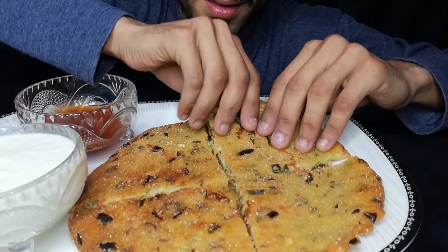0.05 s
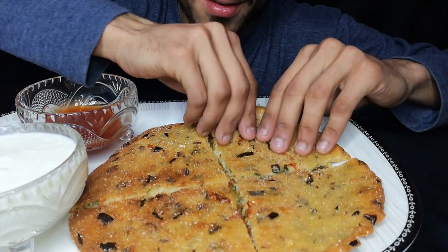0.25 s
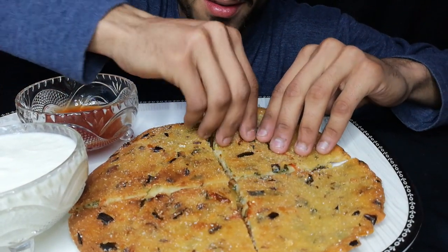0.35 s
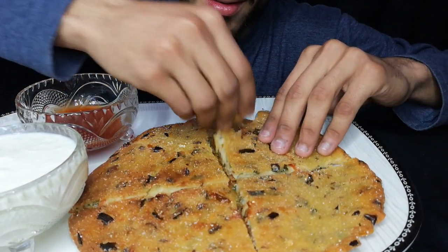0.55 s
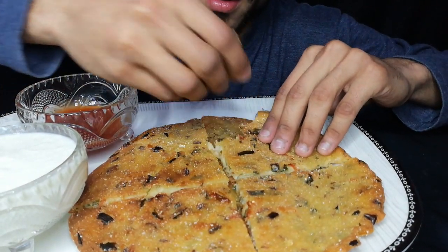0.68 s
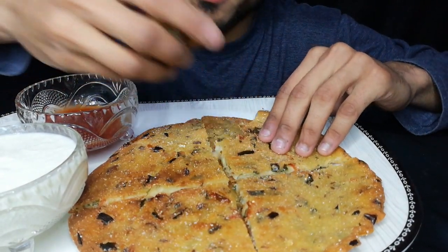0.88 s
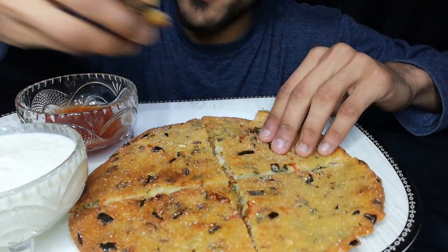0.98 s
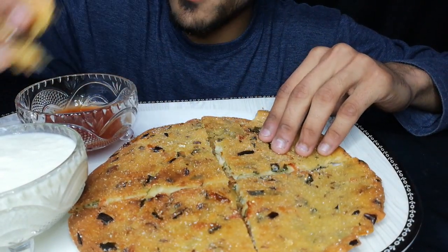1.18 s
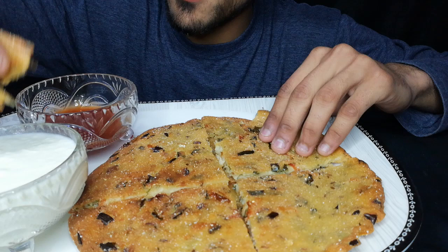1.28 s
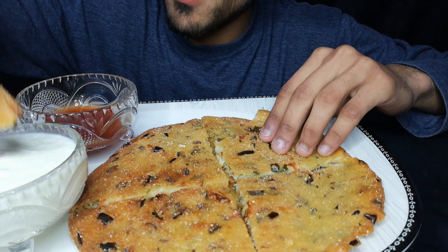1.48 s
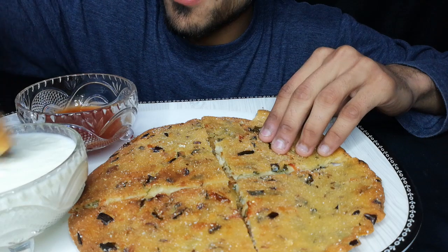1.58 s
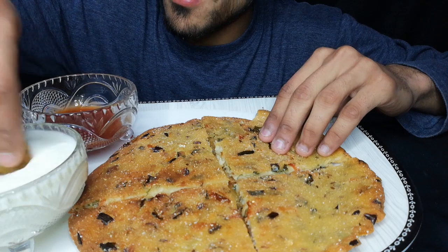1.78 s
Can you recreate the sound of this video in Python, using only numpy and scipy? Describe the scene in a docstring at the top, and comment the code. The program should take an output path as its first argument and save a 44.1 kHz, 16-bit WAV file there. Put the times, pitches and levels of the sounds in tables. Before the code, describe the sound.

Close to the microphone in a quiet room, a flatbread crust cracks and crackles as a piece is torn off. A soft thump on plate and table follows, then faint hand rustles, crumb ticks and one light tap.

```python
"""Tearing crisp flatbread

A quiet room, a stereo microphone close to a plate. Just right of centre, a hand tears off a piece of
flatbread: the crust gives way in short cracks over fine crackle, then the bread drops back and thumps
plate and table. The hand carries the piece away with faint rustles, crumb ticks and one light tap."""
import sys
import numpy as np
from scipy import signal
from scipy.fft import rfft, irfft, next_fast_len
from scipy.io import wavfile

SR = 44100
rng = np.random.default_rng(int(sys.argv[2]) if len(sys.argv) > 2 else 0)


def inscribe(sig):
    """Save sig as 16-bit PCM at rate SR to the path in sys.argv[1].

    A 1-D sig is mono; a 2-D sig holds one channel per row.
    Samples are clipped to [-1, 1] before scaling.
    """
    pcm = np.round(np.clip(np.atleast_2d(sig).T, -1, 1) * 32767)
    wavfile.write(sys.argv[1], SR, pcm.astype(np.int16))


N = 81585

# bright spectrum of the cracking crust, with the microphone's 9 kHz peak (frequency [Hz], level [dB])
BRIGHT_SPECTRUM = [(300, -63), (3000, -19), (5600, -12), (6600, -3), (7300, -6), (7900, 0), (8500, -4),
                   (9400, 1.5), (10300, -5.5), (11100, -7.5), (12000, -15.5), (16000, -29.5)]
# spectrum of the dough under the crust (frequency [Hz], level [dB])
DOUGH_SPECTRUM = [(100, -24.5), (450, -23), (800, -20), (1050, -13.5), (1400, -3.5), (1800, -7),
                  (2400, -0.5), (3000, -4.5), (3800, 3), (4800, 1.5), (6500, -14.5), (12000, -74)]
FRACTURE_CORRELATION = 0.35  # between left and right


def crust():
    """Cracks and fine crackle have a bright part and a doughy body; the crispest add a glassy top."""
    # cracks (time [s], bright level [dB], dough re bright [dB], glassy re bright [dB], time scale [ms])
    cracks = [(0.1853, -43, -6, -27, 1.3), (0.2008, -40, -14, -19, 1.3), (0.2078, -37, -9, -19, 1.0),
              (0.212, -34, -9, -27, 1.1), (0.2176, -29, -13, -27, 1.1), (0.2302, -37, 0, -14, 1.3),
              (0.2332, -31, -10, -14, 1.6), (0.2363, -29, -10, -21, 1.6), (0.2436, -33, 0, -15, 0.9),
              (0.2473, -29, -7, -27, 0.8), (0.2515, -29, -8, -20, 1.5), (0.2694, -38, -4, -16, 1.5),
              (0.2786, -32, -3, -20, 1.7), (0.2858, -36, -6, -18, 0.9), (0.289, -33, -9, -16, 1.0),
              (0.2974, -33, -11, -16, 1.1), (0.3002, -30, -10, -18, 1.1), (0.3256, -34, -6, -22, 1.1),
              (0.3411, -29, -13, -27, 1.1), (0.3492, -38, -11, -16, 1.3), (0.3621, -45, -12, -23, 1.4),
              (0.3783, -35, -10, -27, 0.9), (0.3949, -33, -17, -27, 0.7), (0.4359, -44, -8, -15, 1.1),
              (0.451, -43, -15, -27, 1.4), (0.4968, -33, -16, -11, 0.5), (0.5115, -43, -10, -13, 1.4),
              (0.522, -44, -4, -13, 1.8), (0.5388, -43, -9, -21, 0.6), (0.5466, -45, -15, -8, 0.5),
              (0.5581, -44, -15, -19, 0.7), (0.5722, -45, -3, -21, 0.6), (0.5915, -50, -8, -20, 1.0)]
    # fine crackle along the tear (time [s], level [dB])
    crackle_levels = [(.175, -71.5), (.186, -50.5), (.21, -54), (.24, -39), (.265, -42), (.3, -43.5),
                      (.36, -51.5), (.42, -55), (.46, -54.5), (.487, -62.5), (.505, -61), (.52, -49.5),
                      (.535, -49.5), (.56, -61), (.6, -59), (.69, -78)]
    # spectrum of the glassy top (frequency [Hz], level [dB])
    glassy_spectrum = [(3000, -44), (9000, -8), (13000, 6), (16000, 5)]
    # balance of the tear at the microphone (frequency [Hz], left minus right [dB])
    balance = [(400, -2), (1300, 0), (2200, -4.5), (4500, 0), (8500, -7), (11000, 1), (13500, 0)]
    tear = envelope(crackle_levels)
    bright = amp(1.5) * tear * grains(per_s=2200, spread_db=1)
    dough = amp(-4) * tear * grains(per_s=2200, spread_db=1)
    glassy = np.zeros((2, N))
    for s, db, dough_db, top_db, ms in cracks:
        add(bright, s, amp(db - 0.5) * avalanche(ms))
        add(dough, s, amp(db + dough_db - 0.5) * avalanche(ms))
        add(glassy, s, amp(db + top_db + 4.5) * avalanche(ms))
    sound = coloured(bright, BRIGHT_SPECTRUM) + coloured(dough, DOUGH_SPECTRUM)
    sound += coloured(glassy, glassy_spectrum)
    lag_s = np.array([[.00009], [0]])  # the tear lies to the right, so the left hears it later
    sides = np.array([[.5], [-.5]])
    return filtered(sound, lambda hz: amp(sides * along(balance, hz)) * np.exp(-2j * np.pi * hz * lag_s))


def avalanche(scale_ms):
    """A run of fractures swells and dies quickly, with the energy of 3 ms at rms 1."""
    age = np.arange(600) / SR * 1000 / scale_ms
    burst = fracture_noise(age.size) * age * np.exp(-1.7 * age)
    return burst / np.linalg.norm(burst, axis=1, keepdims=True) * np.sqrt(.003 * SR)


def grains(per_s, spread_db):
    """Stereo train of tiny random fractures, rms 1."""
    sizes = amp(spread_db * np.minimum(rng.exponential(size=N), 4))
    hits = rng.random(N) < per_s / SR
    return unit(hits * sizes * fracture_noise(N))


def fracture_noise(size):
    """White noise, partly shared by left and right."""
    noise = rng.standard_normal((3, size))
    return np.sqrt(FRACTURE_CORRELATION) * noise[0] + np.sqrt(1 - FRACTURE_CORRELATION) * noise[1:]


def tableware():
    """Thumps ring the plate and the table under it; taps and damped tones are short and higher."""
    # soft blows on the plate (time [s], plate level [dB], table boom level [dB])
    thumps = [(0.0188, -57, -53), (.519, -59, -56.5), (.651, -47.5, -44)]
    # modes of the plate (frequency [Hz], level [dB], t60 [s])
    plate_modes = [(153, -2.5, 0.22), (297.5, -5.5, 0.17), (426, -5, 0.12), (463, -3.5, 0.071),
                   (619, -3.5, 0.042), (702, -2.5, 0.028), (1080, -20.5, 0.23), (1265, -5.5, 0.089),
                   (1280, -36, 0.041), (1390, 1.5, 0.025)]
    # modes of the table (frequency [Hz], level [dB], t60 [s])
    table_modes = [(50.8, -3.5, 0.51), (67.9, 4.5, 0.21)]
    # a dull crack and a light tap (time [s], level [dB], pitch [Hz], t60 [s], knock level [dB])
    taps = [(0.4282, -32, 2530, 0.006, -81), (1.1578, -47, 1530, 0.022, -63)]
    # modes of a tap (pitch [ratio], level [dB], t60 [ratio])
    tap_modes = [(.8, -30, 0.39), (1, 1, 1), (1.3, -11, 0.21), (2.7, -5.5, 0.55)]
    # soft knock under a tap (frequency [Hz], level [dB], t60 [s])
    knock_modes = [(356, 4, 0.029), (427, 0.5, 0.073), (785, 3, 0.018)]
    # short damped tones: the upper ring of a dull crack, and faint clinks
    # (time [s], level [dB], pitch [Hz], t60 [s])
    damped_tones = [(0.022, -57.5, 3165, 0.08), (.4281, -39, 3370, 0.015), (1.673, -52, 4270, 0.014),
                    (1.688, -52.5, 3200, 0.019), (1.688, -52, 2460, 0.016)]
    out = np.zeros((2, N))
    for s, db, boom_db in thumps:
        add(out, s, amp(db) * ring(plate_modes, rise_s=0.0015))
        add(out, s, amp(boom_db) * ring(table_modes, rise_s=0.007))
    for s, db, hz, t60, knock_db in taps:
        modes = [(hz * ratio, mode_db, t60 * life) for ratio, mode_db, life in tap_modes]
        add(out, s, amp(db) * ring(modes, rise_s=0.00024))
        add(out, s, amp(knock_db) * ring(knock_modes, rise_s=0.00025))
    for s, db, hz, t60 in damped_tones:
        add(out, s, ring([(hz, db, t60)], rise_s=0.00031))
    return out


def ring(modes, rise_s):
    """Damped modes ring after a contact with the given rise."""
    t = np.arange(SR * 3 // 4) / SR
    ringing = sum(amp(db - 60 * t / t60) * np.sin(2 * np.pi * hz * t) for hz, db, t60 in modes)
    return ringing * (1 - np.exp(-t / rise_s))


def crumbs():
    """Flakes of crust tick under the fingers."""
    # crumb ticks (time [s], bright level [dB], dough re bright [dB], left minus right [dB])
    ticks = [(0.0112, -55, -1, -6), (0.9999, -53, -10, -8), (1.0915, -59, -9, -1), (1.2085, -52, -12, 1),
             (1.321, -59, -10, 3), (1.446, -60, -9, -8), (1.5362, -52, -15, 3), (1.5628, -51, -18, 7),
             (1.6015, -49, -15, 3), (1.7472, -56, -10, 2), (1.8329, -62, -6, 3)]
    bright, dough = np.zeros((2, 2, N))
    for s, db, dough_db, pan_db in ticks:
        add(bright, s, amp(db - 2.5) * pan(pan_db) * avalanche(scale_ms=1.3))
        add(dough, s, amp(db + dough_db - 4) * pan(pan_db) * avalanche(scale_ms=1.3))
    return coloured(bright, BRIGHT_SPECTRUM) + coloured(dough, DOUGH_SPECTRUM)


def rustle():
    """Each movement of the hand, and the bread landing on the plate, is a swell of dense friction grains."""
    # moves of fingers and sleeve, and the brief crackle of the bread landing at 0.648 s (peak time [s], rise
    # [s], fall [s], level [dB], left minus right [dB])
    moves = [(0.019, 0.085, 0.036, -59.5, -5), (0.076, 0.0069, 0.038, -62, -2),
             (0.648, 0.0093, 0.01, -48.5, -8), (0.788, 0.018, 0.033, -62.5, -3.5),
             (0.91, 0.06, 0.024, -56.5, -4), (1.226, 0.077, 0.039, -60.5, 3.5),
             (1.614, 0.027, 0.028, -56.5, 3), (1.671, 0.01, 0.0052, -52.5, 3),
             (1.689, 0.0042, 0.038, -55, 4)]
    # spectrum of the rustle (frequency [Hz], level [dB])
    spectrum = [(200, -60), (700, -25), (1400, -16), (2200, -10), (4200, -6.5), (6000, -6.5), (8000, -4.5),
                (9500, 3), (11000, -3), (13000, -15), (16000, -20.5)]
    t = np.arange(N) / SR
    swell = np.zeros((2, N))
    for s, rise, fall, db, pan_db in moves:
        width = np.where(t < s, rise, fall)
        swell += amp(db) * pan(pan_db) * np.exp(-((t - s) / width) ** 2)
    return swell * coloured(grains(per_s=2900, spread_db=1.5), spectrum)


def echoes(x, t60):
    """Reflections arrive as a diffuse tail, different in each channel."""
    t = np.arange(SR // 2) / SR
    tail = rng.standard_normal((2, len(t))) * amp(-60 * t / t60) * (1 - np.exp(-t / 0.00098))
    tail /= np.linalg.norm(tail, axis=1, keepdims=True)
    return signal.fftconvolve(x, tail, axes=1)[:, :N]


def table_rumble():
    """The table rumbles under the moving hands, the same in both channels."""
    # course of the rumble (time [s], level [dB])
    levels = [(0, -78), (.06, -56.5), (.15, -66), (.23, -64), (.31, -59), (.45, -73), (.56, -62.5),
              (.7, -65.5), (.9, -65), (1.04, -70.5), (1.35, -69), (1.65, -72.5), (1.78, -62.5), (1.85, -68)]
    # spectrum of the rumble (frequency [Hz], level [dB])
    spectrum = [(15, -14), (30, -9), (47, -7.5), (65, -7), (90, -27.5), (200, -52), (600, -119)]
    return envelope(levels) * unit(filtered(rng.standard_normal(N), lambda hz: amp(along(spectrum, hz))))


def room_tone():
    """Steady hiss of room and microphone, near the centre in the bass and wide in the treble."""
    # spectrum of the hiss (frequency [Hz], level [dB])
    spectrum = [(41, -12), (70, -8), (113, -1.5), (174, -3), (360, -7), (664, -16), (1440, -10.5),
                (2270, -15), (3410, -14.5), (3910, -15.5), (5020, -15), (7560, -18), (9270, -14),
                (10200, -19), (16000, -24)]
    # likeness of left and right (frequency [Hz], correlation [0 to 1])
    correlation = [(60, 0.64), (150, 0.98), (400, 0.15), (1200, 0.1), (4000, 0.017)]

    def mid_side_gains(hz):
        angle = np.arccos(along(correlation, hz)) / 2
        return amp(along(spectrum, hz)) * [np.cos(angle), np.sin(angle)]

    mid, side = filtered(rng.standard_normal((2, N)), mid_side_gains)
    return amp(-65) * unit(np.array([mid + side, mid - side]))


def amp(db):
    """Decibels to gain."""
    return 10 ** (np.asarray(db) / 20)


def unit(x):
    """Scale to rms 1."""
    return x / np.sqrt(np.mean(x ** 2) + 1e-20)


def along(points, hz):
    """Read (frequency [Hz], value) points on a log axis."""
    freqs, values = np.transpose(points)
    return np.interp(np.log(hz + 1), np.log(freqs + 1), values)


def envelope(points):
    """Gain per sample from (time [s], level [dB]) points."""
    return amp(np.interp(np.arange(N) / SR, *np.transpose(points)))


def pan(db):
    """Left and right gains of constant power."""
    return unit(amp([[db / 2], [-db / 2]]))


def add(track, s, sound):
    """Mix a sound into a track at time s."""
    start = max(0, round(s * SR))
    part = track[..., start:start + sound.shape[-1]]
    part += sound[..., :part.shape[-1]]


def filtered(x, response):
    """Apply a frequency response to x."""
    size = next_fast_len(N + SR // 2)
    return irfft(rfft(x, size) * response(np.fft.rfftfreq(size, 1 / SR)), size)[..., :N]


def coloured(x, spectrum, size=8192):
    """Pass x through a causal filter of unit energy with the given spectrum."""
    cepstrum = irfft(np.log(amp(along(spectrum, np.fft.rfftfreq(size, 1 / SR)))))
    cepstrum[1:size // 2] *= 2  # fold to minimum phase
    cepstrum[size // 2 + 1:] = 0
    impulse = irfft(np.exp(rfft(cepstrum)))
    return signal.fftconvolve(x, impulse[None] / np.linalg.norm(impulse), axes=1)[:, :N]


def scene():
    """Bread and plate at close range, scatter off the dishes, and a dry room behind."""
    bread = crust() + crumbs() + rustle()
    direct = bread + tableware()
    dish_scatter = amp(-11) * echoes(bread, t60=.03)
    room = amp(-19) * echoes(direct, t60=.16)
    return direct + dish_scatter + room + table_rumble() + room_tone()


def record(dry):
    """Nothing is kept above the band limit."""
    return filtered(dry, lambda hz: hz < 15950)


dry = scene()
out = record(dry)
inscribe(out)
```